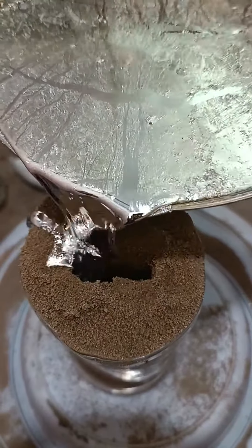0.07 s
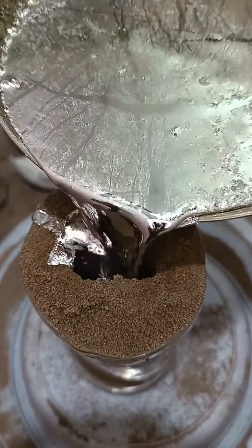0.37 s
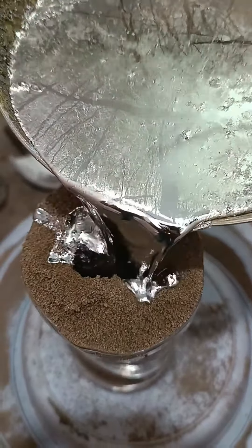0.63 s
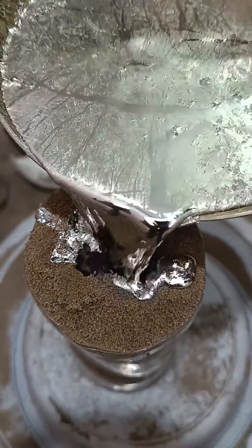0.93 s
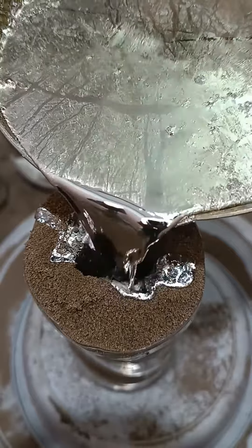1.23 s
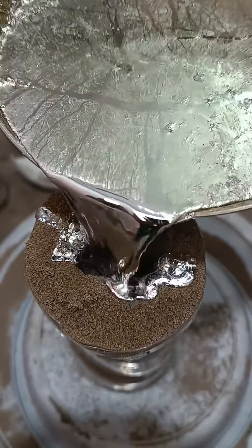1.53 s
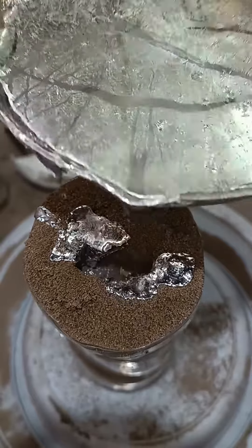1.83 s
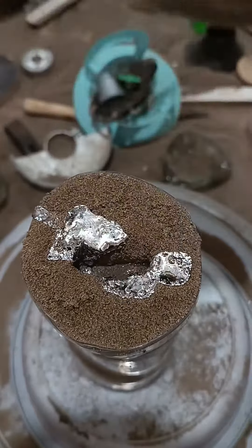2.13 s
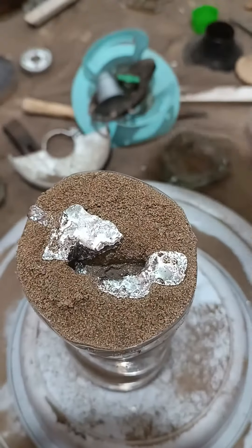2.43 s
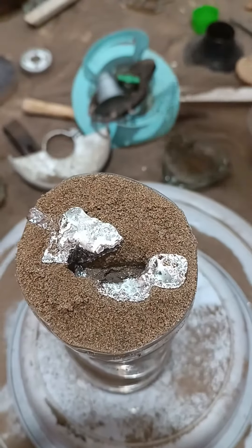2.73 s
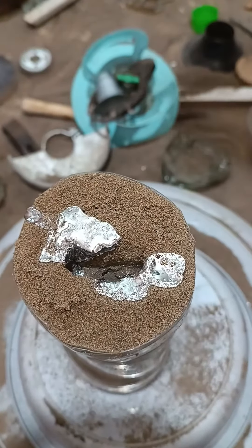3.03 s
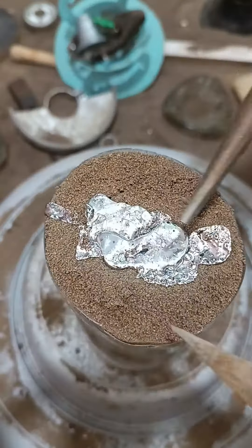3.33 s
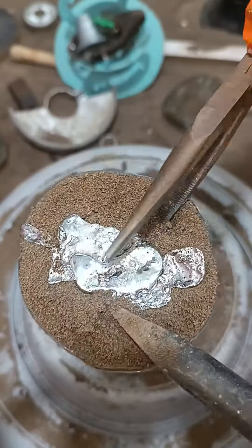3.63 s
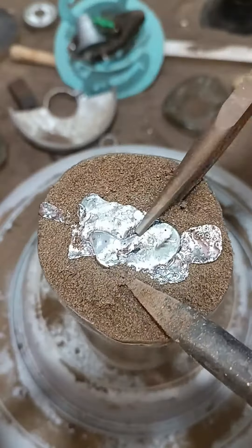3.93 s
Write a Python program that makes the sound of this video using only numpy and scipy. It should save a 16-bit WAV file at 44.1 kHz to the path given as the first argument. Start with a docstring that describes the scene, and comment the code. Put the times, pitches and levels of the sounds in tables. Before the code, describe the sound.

Molten metal pours into a small sand mould for two seconds over a low workshop rumble, glugging around 0.3 seconds, then spattering and sizzling, with a sharp crack near 1.5. Cooling metal ticks throughout. From 2.4 to 2.8 a pan slides down nearby, grinding, squeaking and ringing lightly. After a brief dip at 3.3, a steel tool knocks and scrapes the casting until 4, while the stand drums low.

```python
"""In a foundry workshop, molten metal runs from a pan into a small sand mould over a low rumble.
The stream splashes in the cavity, trapped gas glugs and the damp sand sizzles; cooling metal ticks.
The pan is slid down nearby: friction makes it grind and squeak, and contacts set its rim ringing.
After a brief drop in level, a steel tool scrapes the casting in the sand while the stand drums below."""
import sys
import numpy as np
from scipy import signal
from scipy.fft import rfft, irfft, next_fast_len
from scipy.io import wavfile
from scipy.ndimage import uniform_filter1d, map_coordinates

SR = 44100
rng = np.random.default_rng(int(sys.argv[2]) if len(sys.argv) > 2 else 0)


def wrap_up_sound(samples):
    """Save the sound to the file named by the first command line argument, as 16-bit audio."""
    columns = np.atleast_2d(samples).T
    # keep every value between -1 and 1, then stretch to whole-number steps
    tamed = np.clip(columns, -1, 1)
    steps = np.round(tamed * 32767).astype(np.int16)
    wavfile.write(sys.argv[1], SR, steps)


N = 176400

# Levels are relative: each source applies its own gains and filters.
RUMBLE_ENVELOPE = [(0, -45.5), (.14, -50.5), (.24, -43.5), (.62, -48.5), (.88, -46), (1.05, -51),
                   (1.22, -47), (1.55, -52), (2.07, -54.5), (2.17, -48), (2.3, -56), (2.5, -47.5),
                   (2.75, -54.5), (3.26, -52.5)]  # low rumble: time_s, level_db
RUMBLE_SPECTRUM = [(30, -22.5), (85, -30), (130, -2.5), (190, -0.5), (240, -11), (370, -14), (500, -24.5),
                   (1000, -56)]  # frequency_hz, level_db
AIR_SPECTRUM = [(20, -22), (60, 0), (110, 3.5), (300, -7), (700, -15), (2300, -22), (6000, -38),
                (10000, -48.5), (15000, -36)]  # faint steady air: frequency_hz, level_db

# cracking metal and sand, the pan's contact, the tool's knock: start_s, level_db, centre_hz
CLICKS = [(0.026, -47, 14000), (0.119, -49, 14000), (.491, -39.5, 12100), (.712, -50.5, 14000),
          (.822, -51, 13000), (.990, -51, 13000), (1.300, -31.5, 3030), (1.446, -37, 1300),
          (1.466, -35.5, 1510), (1.4772, -21.5, 1900), (1.705, -38.5, 6500), (1.752, -36.5, 3870),
          (1.770, -40.5, 8350), (2.073, -41.5, 5450), (2.188, -47.5, 9800), (2.732, -40.5, 3000),
          (2.784, -50.5, 7000), (3.2455, -40.5, 3500), (3.552, -25, 3000), (3.594, -27, 4470),
          (3.7669, -29, 2130)]
CLICK_SPECTRUM = [(.1, -20), (.5, -7), (1, 0), (2, -12), (3.5, -20), (7, -17)]  # multiple_of_centre, level_db
# sliding metal and escaping gas: start_s, length_s, pitch_hz, level_db, waver_share, overtones_db
SQUEAKS = [(0.181, 0.13, 1363, -58.5, 0.0069, 0), (0.67, 0.043, 2470, -49.5, 0.094, -20),
           (0.736, 0.033, 2585, -50.5, 0.24, -12), (2.706, 0.039, 1460, -47.5, 0.107, -20),
           (3.317, .09, 2220, -63, .012, -31), (3.852, 0.031, 1376, -43.5, 0.0213, 6.5),
           (3.858, 0.032, 3290, -57, 0.02, -16)]
SQUEAK_HARMONICS = [-3.9, -20, -26]  # second to fourth harmonic: level_db

STAND_ENVELOPE = [(3.34, -61), (3.39, -43.5), (3.415, -51.5), (3.445, -41), (3.51, -42.5), (3.57, -42.5),
                  (3.72, -38), (3.79, -38.5), (3.87, -43), (4, -38)]  # drumming of the mould's stand: time_s, level_db
STAND_SPECTRUM = [(30, -26), (130, -5), (177, 0), (230, -10), (370, -18.5), (470, -16.5), (1200, -33.5),
                  (2200, -28.5), (4000, -55.5)]  # frequency_hz, level_db
STAND_RESONANCE = [(183.2, 17, 0.5)]  # centre_hz, bandwidth_hz, level_db

KNOCKS = [(2.717, -56, 0.14), (3.552, -33.5, 0.04), (3.574, -37.5, 0.077), (3.609, -42.5, 0.031),
          (3.657, -37.5, .03), (3.765, -34, 0.025), (3.975, -46, 0.065)]  # of the sliding pan and, later, the tool: start_s, level_db, t60_s
STEEL_RESONANCES = [(1445, 52, -5), (2260, 140, -1), (3280, 280, 1.5), (4400, 130, -6), (5470, 90, -3)]  # centre_hz, bandwidth_hz, level_db
TOOL_STROKES = [(3.6, 0.007, 0.024, 0.14, -39.5), (3.644, 0.025, 0.028, .24, -38.5),
                (3.841, 0.017, 0.025, 0.24, -38)]  # start_s, rise_s, hold_s, t60_s, level_db
SCRAPE_SPECTRUM = [(200, -32), (450, -4.5), (950, -16), (1500, -12.5), (3300, -11), (4500, -9.5),
                   (8000, -15.5), (11000, -16), (14500, -11.5), (16000, -24)]  # frequency_hz, level_db
RASP_LEADS_S = [0.00013, .00005]  # earlier arrival on the left, for each layer of the rasp: lead_s

# shoves of the pan: start_s, rise_s, hold_s, t60_s, body_db, grit_db
PAN_SHOVES = [(2.415, 0.0099, 0.025, 0.12, -58, -53.5), (2.44, 0.018, 0.062, 0.29, -47, -52),
              (2.564, 0.014, 0.073, 0.21, -48.5, -63.5), (2.707, 0.012, 0.052, 0.6, -57.5, -66)]
DRAG_SPECTRUM = [(100, -15), (200, -9), (300, -6.5), (420, -10), (560, -3), (700, -11), (1050, -7.5),
                 (1400, -15.5), (2500, -24.5), (5000, -61)]  # the sliding pan's body: frequency_hz, level_db
GRIT_SPECTRUM = [(800, -15), (1500, -3), (2600, -6.5), (3600, -3.5), (5000, -9), (10000, -24.5),
                 (16000, -19)]  # the grit under it: frequency_hz, level_db
PAN_RESONANCES = [(563, 54, 2), (817, 100, -1.5), (1480, 66, -3), (1730, 140, 2.5), (2030, 120, -1)]  # centre_hz, bandwidth_hz, level_db
RIM_MODES = [(3677, -7, .64), (4597, 4, .4), (4930, -6, .25), (5669, -14, .2), (6724, -6, .2),
             (9500, -6, .16), (10680, -10, .2), (13840, -4, .22), (15250, -11, .16)]  # free vibration of the rim: pitch_hz, level_db, t60_s
RIM_HITS = [(2.468, -64, 9), (2.509, -49, 2.5), (2.574, -49.5, 0.5)]  # start_s, level_db, tilt_db_per_octave

# gas bubbles in the melt: start_s, pitch_hz, level_db, t60_s
BUBBLES = [(.273, 434.6, -27, 0.12), (.343, 195.6, -30, 0.5), (.424, 200.4, -36.5, 0.29),
           (1.355, 145.7, -40.5, 0.24), (1.719, 138, -45, 1)]
POUR_ENVELOPE = [(0, -60.5, -76), (.3, -52, -76), (.62, -61, -106), (.92, -54.5, -69.5), (1.1, -55, -67),
                 (1.42, -55, -59.5), (1.55, -54.5, -56), (1.76, -65, -61), (1.82, -64, -72),
                 (2.0, -69.5, -89)]  # time_s, splash_db, sizzle_db
SPLASH_SPECTRUM = [(120, -20), (250, -2.5), (400, 0), (600, -6.5), (1050, -11), (2200, -19.5),
                   (5000, -31.5), (10000, -54), (16000, -39)]  # frequency_hz, level_db
SIZZLE_SPECTRUM = [(800, -9), (1700, 2), (3100, -0.5), (5300, -9), (8300, -9.5), (10500, -19), (12500, -5),
                   (16000, -10)]  # frequency_hz, level_db
CAVITY_RESONANCES = [(567, 45, 0.5), (884, 57, -0.5), (1210, 130, 0), (1665, 120, 1.5), (2145, 160, 2),
                     (2830, 47, -16)]  # the mould's hollow: centre_hz, bandwidth_hz, level_db
SPATTERS = [(.213, -48.5, 0.061), (.273, -42, 0.14), (.345, -36.5, 0.049), (.355, -38.5, 0.046),
            (.485, -40, 0.038), (.496, -42, 0.023), (.642, -50, 0.03), (.809, -46.5, 0.03),
            (.842, -41.5, 0.03), (.882, -43.5, 0.059), (.990, -47, 0.02), (.910, -43.5, 0.089),
            (.932, -43, 0.037), (.953, -48, 0.023), (1.029, -39, 0.029), (1.197, -36.5, 0.064),
            (1.214, -44, 0.052), (1.278, -39, 0.028), (1.300, -40.5, 0.057), (1.478, -43, 0.11),
            (1.590, -44, 0.028)]  # drops in the mould: start_s, level_db, t60_s
STEAM_PUFFS = [(.272, -56, 0.24), (.492, -64, 0.53)]  # steam from the damp sand: start_s, level_db, t60_s

ROOM_DECAY = [(200, 0.23), (2000, 0.33), (12000, 0.062)]  # workshop reverberation: frequency_hz, t60_s
COHERENCE = [(60, 0.63), (160, 1), (400, 0.72), (1000, 0.016), (3000, 0)]  # left-right likeness of diffuse noise: frequency_hz, correlation
CHANNEL_BALANCE = [(100, 0), (1000, -.5), (4400, -1), (8500, -4.5), (11000, 0), (14000, 7.5)]  # frequency_hz, left_over_right_db

MOULD_LEAD_S = .00012  # the mould's sound arrives this much sooner on the left


def amp(db):
    """Amplitude ratio of a level in decibels."""
    return 10 ** (np.asarray(db) / 20)


def unit(x):
    """Normalisation to an rms of 1."""
    return x / np.sqrt(np.mean(x ** 2) + 1e-20)


def along(points, hz):
    """Interpolation of (frequency_hz, value) points on a logarithmic frequency axis."""
    frequencies, values = np.transpose(points)
    return np.interp(np.log(hz + 1), np.log(frequencies + 1), values)


def envelopes(rows):
    """One amplitude envelope per level column, fading by 200 dB a second beyond the ends."""
    times, *columns = np.transpose(rows)
    t = np.arange(N) / SR
    outside_s = np.maximum(times[0] - t, 0) + np.maximum(t - times[-1], 0)
    return [amp(np.interp(t, times, levels) - 200 * outside_s) for levels in columns]


def stroke(start, rise, hold, t60):
    """Envelope of a push: linear rise, hold and exponential decay."""
    t = np.arange(N) / SR - start
    return np.clip(t / rise, 0, 1) * amp(-60 * np.maximum(t - rise - hold, 0) / t60)


def wobble(knots_per_s):
    """Smooth random modulation: a spline through random knots."""
    knots = rng.standard_normal(int(N * knots_per_s / SR) + 4)
    return map_coordinates(knots, [np.arange(N) * knots_per_s / SR])


def add(track, start, sound):
    """Superposition of a sound on a track, from start seconds on."""
    part = track[round(start * SR):][:len(sound)]
    part += sound[:len(part)]


def filtered(x, response):
    """Linear filtering: the spectrum is multiplied by a complex frequency response."""
    size = next_fast_len(N + SR // 2)
    return irfft(rfft(x, size) * response(np.fft.rfftfreq(size, 1 / SR)), size)[..., :N]


def body(x, spectrum, resonances=(), ring_db=0, size=8192):
    """Resonant body: a minimum-phase filter of unit energy, with peaks on a broad spectrum."""
    hz = np.fft.rfftfreq(size, 1 / SR)
    peaks = sum(amp(db + ring_db) ** 2 / (1 + (2 * (hz - centre) / width) ** 2)
                for centre, width, db in resonances)
    magnitude = amp(along(spectrum, hz)) * np.sqrt(1 + peaks)
    cepstrum = irfft(np.log(np.maximum(magnitude, 1e-6)))
    cepstrum[1:size // 2] *= 2  # folding makes the filter causal
    cepstrum[size // 2 + 1:] = 0
    response = irfft(np.exp(rfft(cepstrum)))
    return signal.fftconvolve(x, response / np.linalg.norm(response))[:N]


def grit(per_s, spread_db, hiss_db):
    """Shot noise: tiny random impacts over a smooth hiss."""
    sizes = amp(spread_db * np.minimum(rng.exponential(size=N), 3)) * rng.choice([-1, 1], N)
    impacts = unit(sizes * (rng.random(N) < per_s / SR))
    return unit(impacts + amp(hiss_db) * rng.standard_normal(N))


def bursts(rows):
    """Exponentially damped noise for each (start_s, level_db, t60_s) row."""
    out, t = np.zeros(N), np.arange(SR // 4) / SR
    for start, db, t60 in rows:
        add(out, start, amp(db - 60 * t / t60) * rng.standard_normal(len(t)))
    return out


def shifting(x, depth_db, patch_hz=257.4, patch_s=.03):
    """Time-varying filtering: resonances come and go as the point of contact moves."""
    hz, t, spectra = signal.stft(x, SR, nperseg=512)
    grid = np.meshgrid(hz / patch_hz, t / patch_s, indexing="ij")
    patches = map_coordinates(rng.standard_normal((256, 512)), grid, mode="wrap")
    return unit(signal.istft(spectra * amp(depth_db * patches), SR, nperseg=512)[1][:N])


def diffuse(spectrum):
    """Diffuse field: noise from all around is nearly mono at long wavelengths."""
    def mid_side(hz):
        angle = np.arccos(np.clip(along(COHERENCE, hz), -1, 1)) / 2
        return amp(along(spectrum, hz)) * [np.cos(angle), np.sin(angle)]
    mid, side = filtered(rng.standard_normal((2, N)), mid_side)
    return unit(np.array([mid + side, mid - side]))


def placed(x, wet_db, lead_s=MOULD_LEAD_S, early_db=7, early_t60_s=.019):
    """Arrival-time difference gives direction; early reflections and reverberation give the room."""
    hz, t, spectra = signal.stft(rng.standard_normal((2, SR // 2)), SR, nperseg=256)
    decay = amp(-60 * t / along(ROOM_DECAY, hz)[:, None]) + amp(early_db - 60 * t / early_t60_s)
    tail = signal.istft(spectra * decay, SR, nperseg=256)[1]
    room = signal.fftconvolve(x[None], tail / np.linalg.norm(tail[0]), axes=1)[:, :N]
    direct = filtered(x, lambda f: np.exp(1j * np.pi * f * lead_s * np.array([[1], [-1]])))
    return (direct + amp(wet_db) * room) / np.hypot(1, amp(wet_db))


def background(air_db=-55.5):
    """Ambient noise: an amplitude-modulated low rumble and faint steady air."""
    level, = envelopes(RUMBLE_ENVELOPE)
    return level * diffuse(RUMBLE_SPECTRUM) + amp(air_db) * diffuse(AIR_SPECTRUM)


def clicks(tail_t60_s=.007, ticks_per_s=14):
    """Impulse excitation: sharp clicks of cracking metal and sand, pan and tool; cooling metal ticks."""
    out = np.zeros(N)
    for start, db, centre_hz in CLICKS:
        click = amp(-9) * bursts([(.00088, db, tail_t60_s)])  # short noisy tail
        click[0] += amp(db + 8.5)  # opening impulse
        add(out, start, body(click, [(centre_hz * k, level) for k, level in CLICK_SPECTRUM]))
    tick_sizes = amp(-44.5 + 3.5 * rng.standard_normal(N))
    ticks = tick_sizes * (rng.random(N) < ticks_per_s / SR)
    return placed(out + np.diff(ticks, prepend=0) / 2, wet_db=-5)


def squeaks():
    """Self-excited oscillation: stick-slip of metal and escaping gas make short wavering tones."""
    out, t = np.zeros(N), np.arange(N) / SR
    for start, length, hz, db, waver, overtones_db in SQUEAKS:
        phase = 2 * np.pi * np.cumsum(hz * (1 + waver * wobble(900))) / SR
        swell = np.sin(np.pi * np.clip((t - start) / length, 0, 1))
        overtones = sum(amp(level + overtones_db) * np.sin(k * phase)
                        for k, level in enumerate(SQUEAK_HARMONICS, 2))
        out += amp(db) * swell * (np.sin(phase) + overtones)
    return placed(out, wet_db=-1)


def stand():
    """Forced vibration: the stand drums at its low resonance as the tool pushes on the mould."""
    push, = envelopes(STAND_ENVELOPE)
    drumming = unit(body(rng.standard_normal(N), STAND_SPECTRUM, STAND_RESONANCE, ring_db=6.5))
    return placed(amp(.5) * push * drumming, wet_db=-15.5)


def knocks():
    """Impact: knocks of the sliding pan and, later, of the tool excite resonances of steel."""
    spectrum = [(150, -3), (600, 6), (2200, 5.5), (5000, -1), (15000, -17)]
    return placed(body(bursts(KNOCKS), spectrum, STEEL_RESONANCES, ring_db=9.5), wet_db=2.5)


def tool_scrape():
    """Stick-slip friction: one steel tool rasps through sand and over the casting."""
    force = sum(amp(db) * stroke(*shape) for *shape, db in TOOL_STROKES)
    catching = unit(amp(1.3 * wobble(220)))
    scrape = np.zeros((2, N))
    for lead_s in RASP_LEADS_S:  # independent noise layers spread the rasp between left and right
        crunch = shifting(grit(per_s=1100, spread_db=2.5, hiss_db=-9.5), depth_db=4)
        rasp = body(force * catching * crunch, SCRAPE_SPECTRUM, STEEL_RESONANCES, ring_db=6.5)
        scrape += placed(rasp, wet_db=3, lead_s=lead_s)
    return amp(-2.5) * scrape


def pan_slide():
    """Sliding friction: a gritty surface crunches and excites the resonances of the pan's body."""
    body_force = sum(amp(db) * stroke(*shape) for *shape, db, _ in PAN_SHOVES)
    grit_force = sum(amp(db) * stroke(*shape) for *shape, _, db in PAN_SHOVES)
    coarse = shifting(grit(per_s=610, spread_db=1.5, hiss_db=-6.5), depth_db=2.5)
    fine = shifting(grit(per_s=1200, spread_db=2, hiss_db=-15), depth_db=3)
    drag = body(body_force * coarse, DRAG_SPECTRUM, PAN_RESONANCES, ring_db=5)
    sand = body(grit_force * fine, GRIT_SPECTRUM)
    return amp(2) * placed(drag + sand, wet_db=2, lead_s=0)


def pan_ring(attack_s=.0024):
    """Free vibration: each contact excites the rim's damped modes, brighter the harder the spot."""
    ring, t = np.zeros(N), np.arange(SR // 2) / SR
    lowest_hz = RIM_MODES[0][0]
    for start, db, tilt in RIM_HITS:
        modes = np.zeros(len(t))
        for hz, level, t60 in RIM_MODES:
            mode_db = level + tilt * np.log2(hz / lowest_hz)
            modes += amp(mode_db - 60 * t / t60) * np.sin(2 * np.pi * hz * (start + t))
        add(ring, start, amp(db - 4.5) * modes * (1 - np.exp(-t / attack_s)))
    return placed(ring, wet_db=-13, lead_s=0)


def bubbles(attack_s=.0018, rise_per_s=.14):
    """Bubble resonance: trapped gas pulsates in the liquid metal, rising a little in pitch."""
    out, t = np.zeros(N), np.arange(SR // 2) / SR
    for start, hz, db, t60 in BUBBLES:
        envelope = amp(db - 60 * t / t60) * (1 - np.exp(-t / attack_s))
        phase = 2 * np.pi * hz * t * (1 + rise_per_s * t / 2)
        add(out, start, envelope * np.sin(phase))
    return placed(out, wet_db=-20)


def pour():
    """Cavity resonance colours the stream's splash and spatter; steam sizzles from the damp sand."""
    splash_level, sizzle_level = envelopes(POUR_ENVELOPE)
    stream = splash_level * shifting(grit(per_s=350, spread_db=2, hiss_db=-7), depth_db=2.5)
    splash = body(stream + amp(1.5) * bursts(SPATTERS), SPLASH_SPECTRUM, CAVITY_RESONANCES, ring_db=4.5)
    fizz = sizzle_level * grit(per_s=650, spread_db=8, hiss_db=-9.5)
    sizzle = body(fizz + bursts(STEAM_PUFFS), SIZZLE_SPECTRUM)
    return placed(splash, wet_db=-6.5) + placed(sizzle, wet_db=1)


def scene():
    """Superposition: the sound pressures of all sources add."""
    return (background() + clicks() + squeaks() + stand() + knocks() + tool_scrape()
            + pan_slide() + pan_ring() + bubbles() + pour())


def record(dry):
    """Gating and filtering: the level drops once, the channels differ in treble, the band is limited."""
    dip_start_s, dip_end_s, dip_db, top_hz = 3.272, 3.335, -36.5, 16100
    t = np.arange(N) / SR
    gate = np.where((t > dip_start_s) & (t < dip_end_s), amp(dip_db), 1.)
    dipped = dry * uniform_filter1d(gate, size=130)
    sides = np.array([[.5], [-.5]])
    return filtered(dipped, lambda hz: amp(along(CHANNEL_BALANCE, hz) * sides) * (hz < top_hz))


dry = scene()
out = record(dry)
wrap_up_sound(out)
```